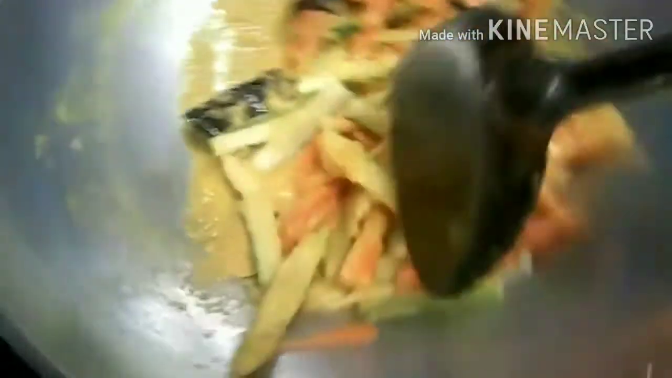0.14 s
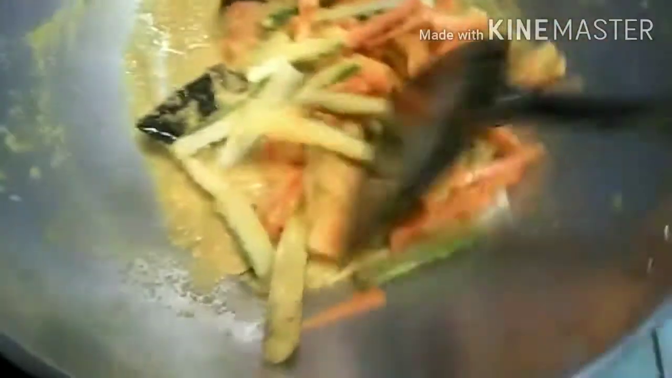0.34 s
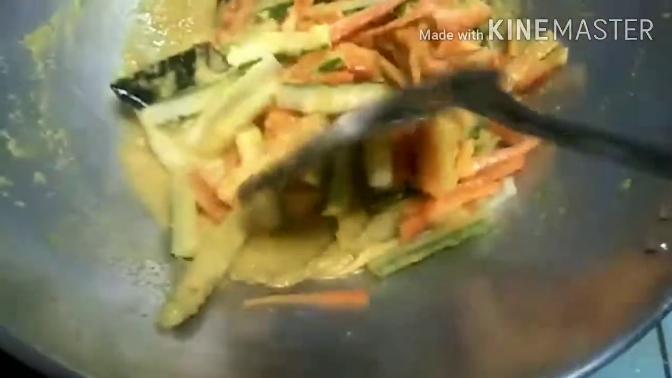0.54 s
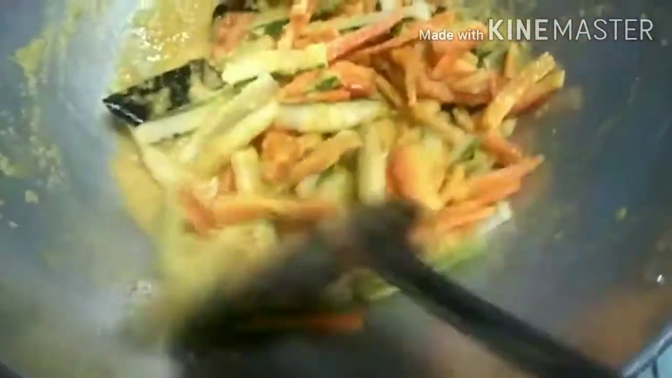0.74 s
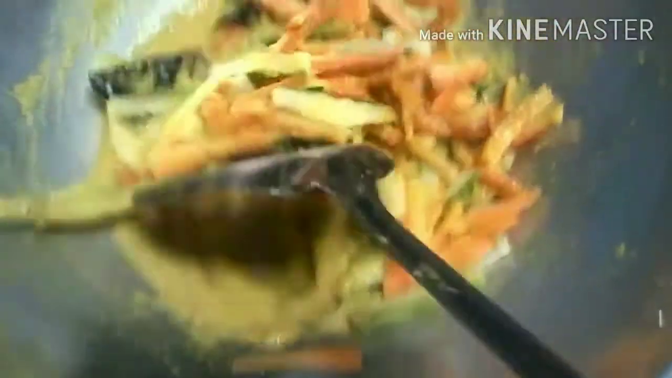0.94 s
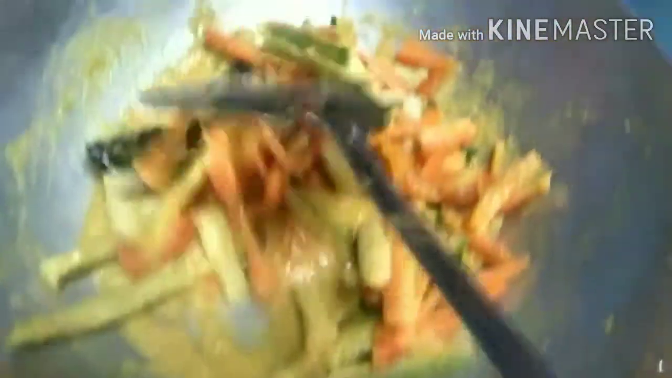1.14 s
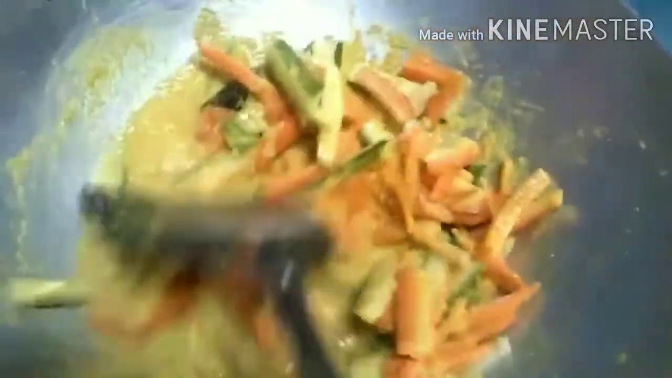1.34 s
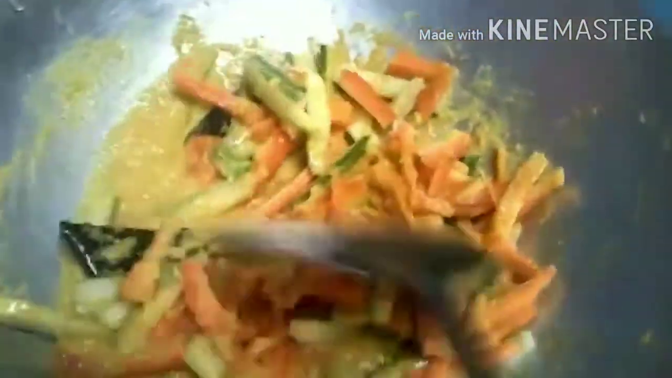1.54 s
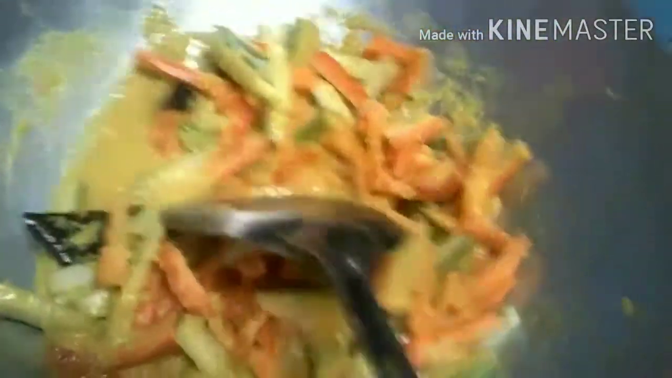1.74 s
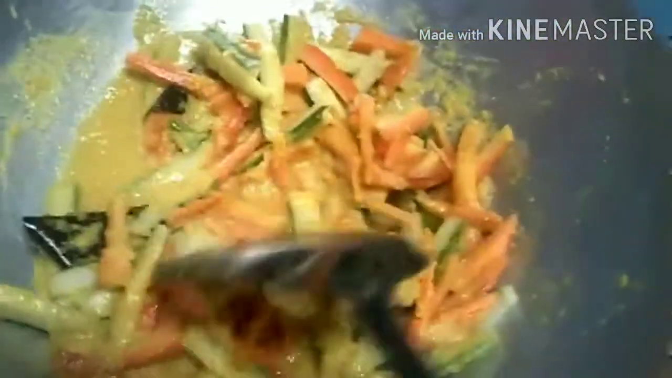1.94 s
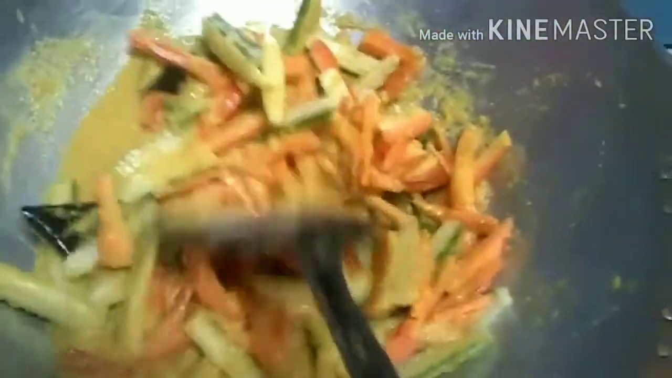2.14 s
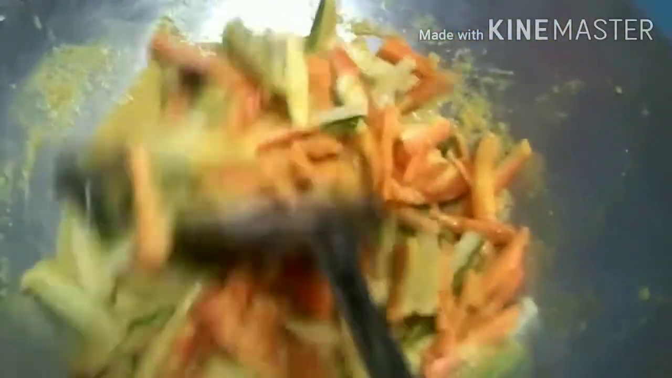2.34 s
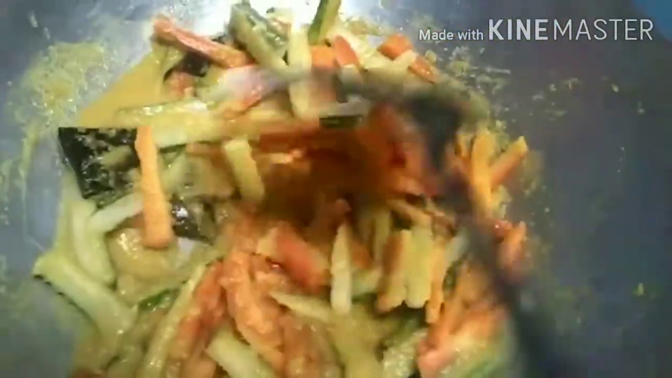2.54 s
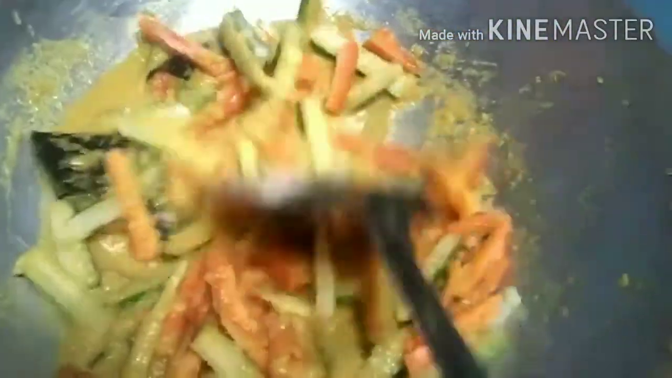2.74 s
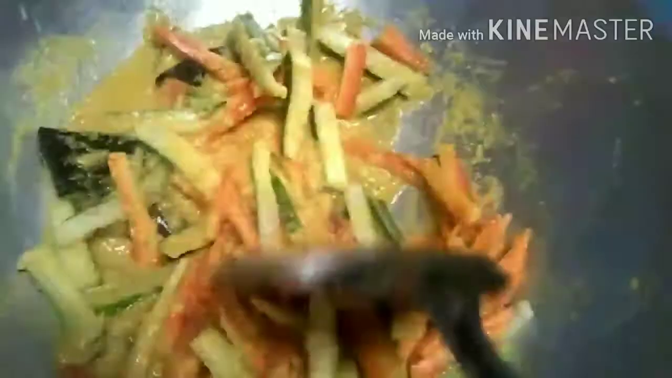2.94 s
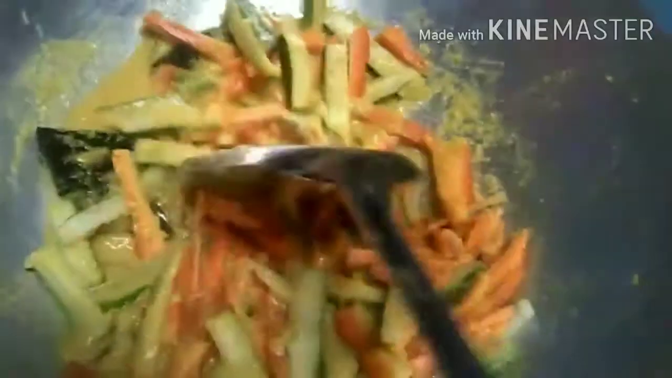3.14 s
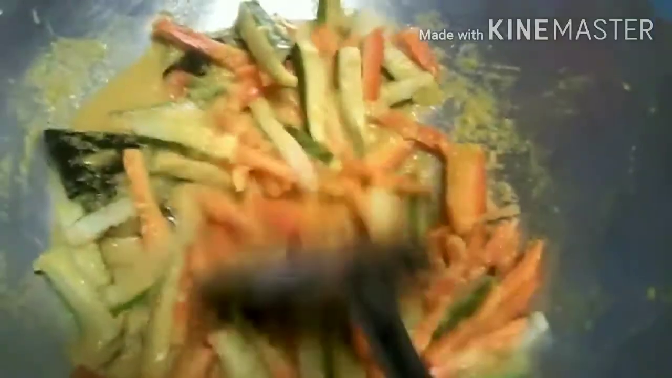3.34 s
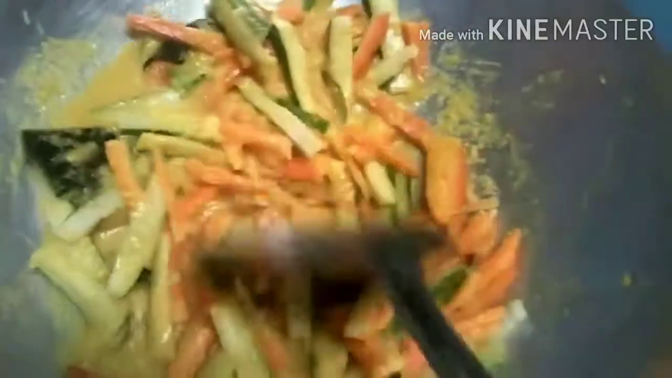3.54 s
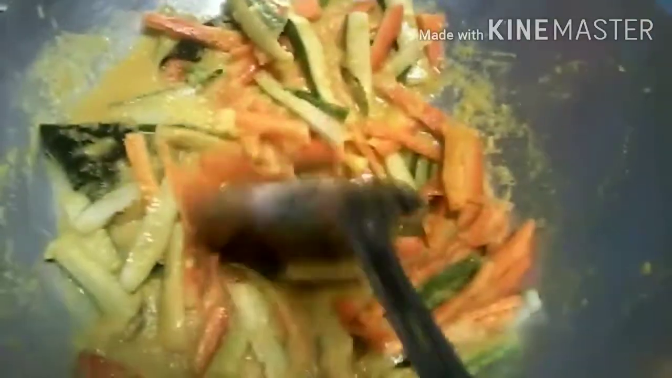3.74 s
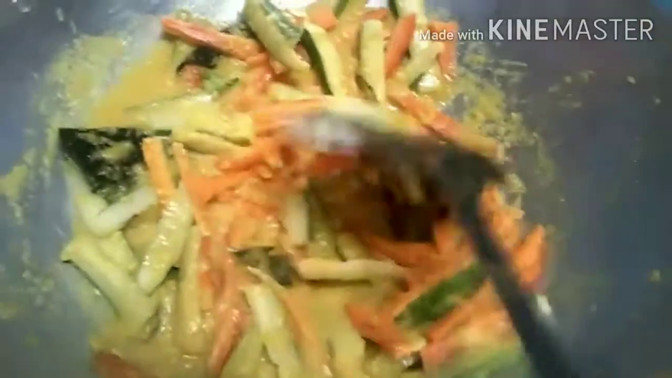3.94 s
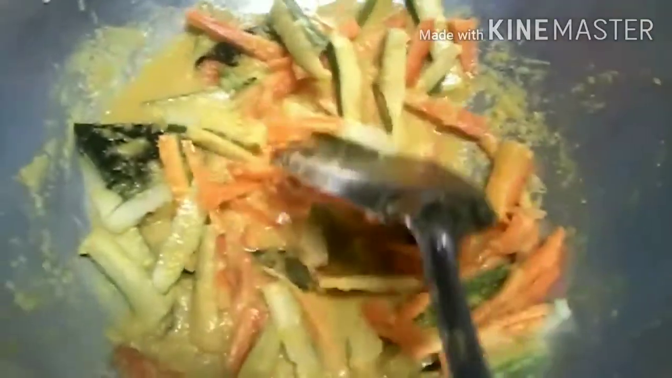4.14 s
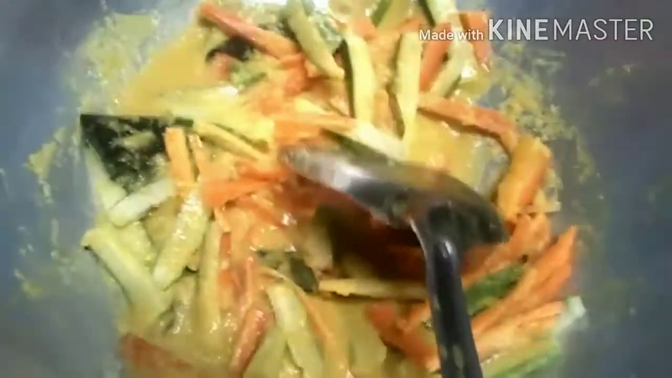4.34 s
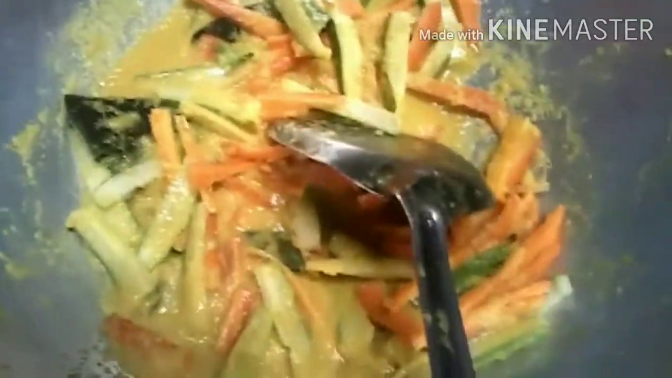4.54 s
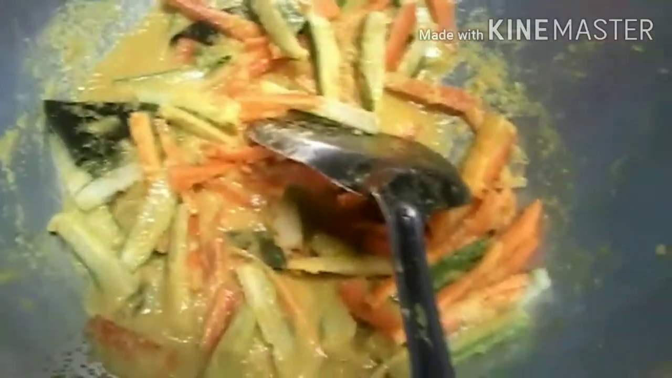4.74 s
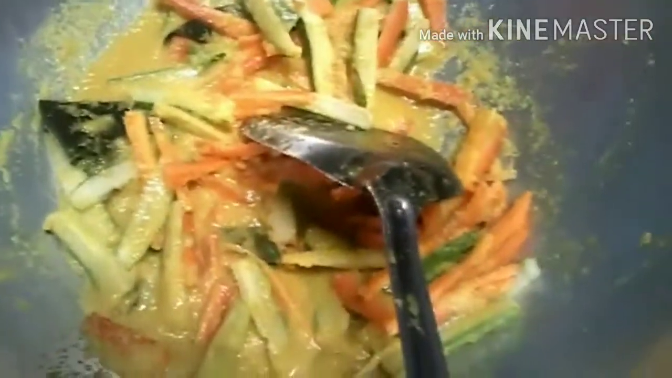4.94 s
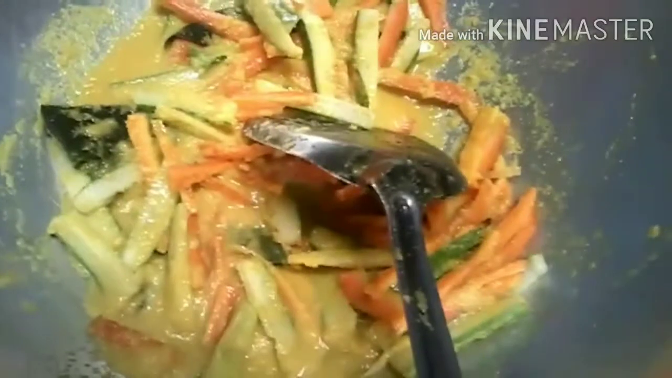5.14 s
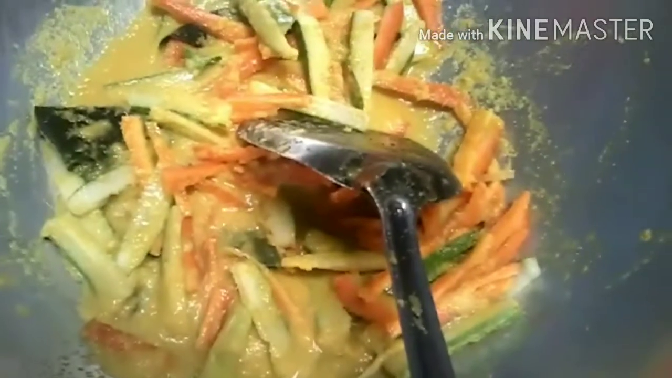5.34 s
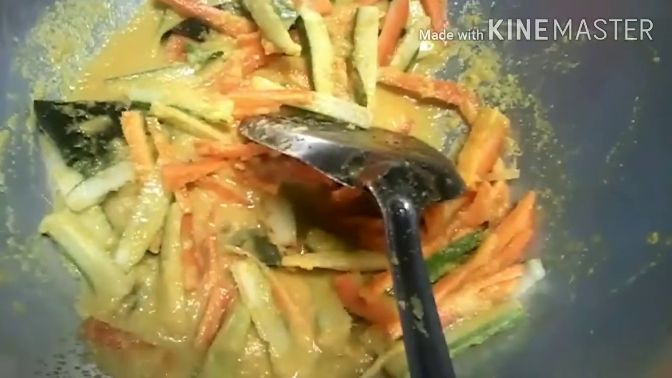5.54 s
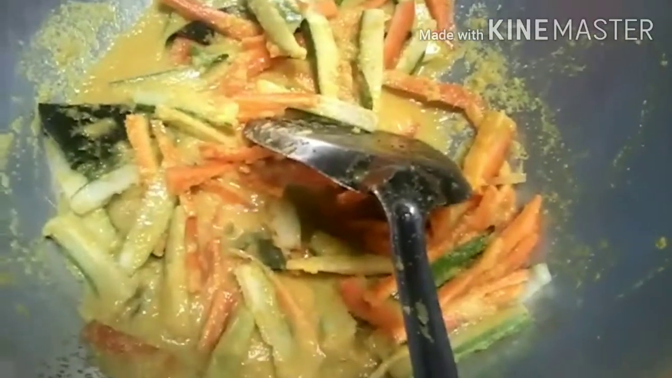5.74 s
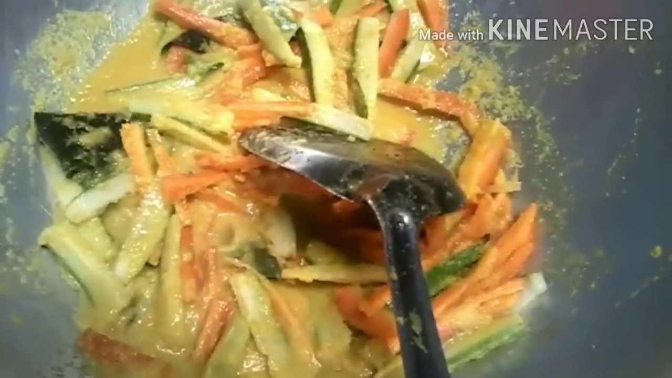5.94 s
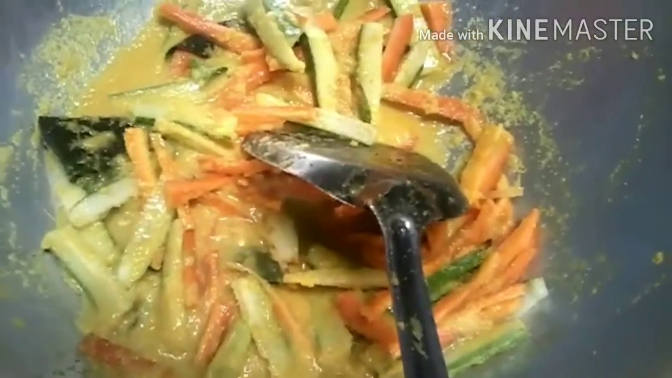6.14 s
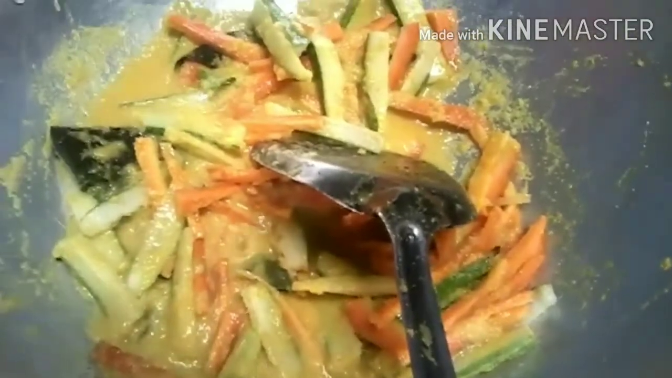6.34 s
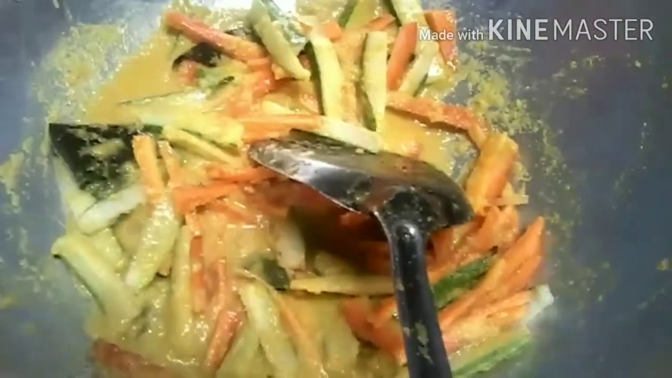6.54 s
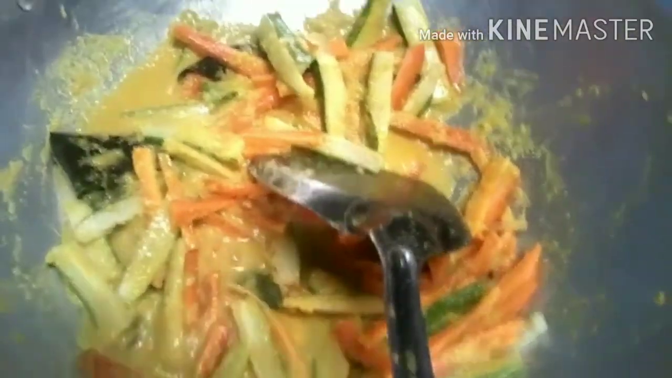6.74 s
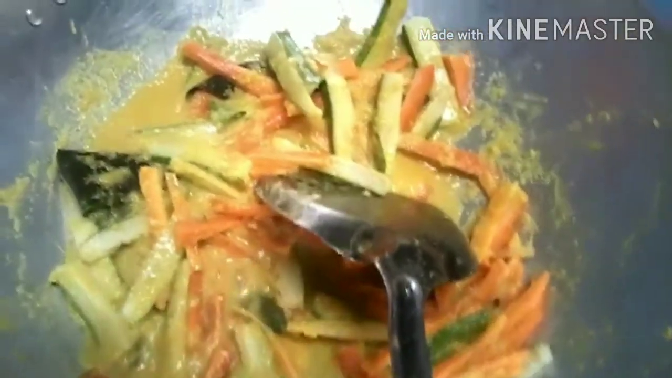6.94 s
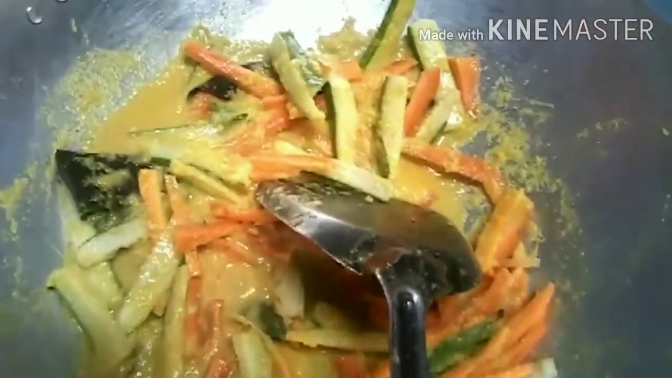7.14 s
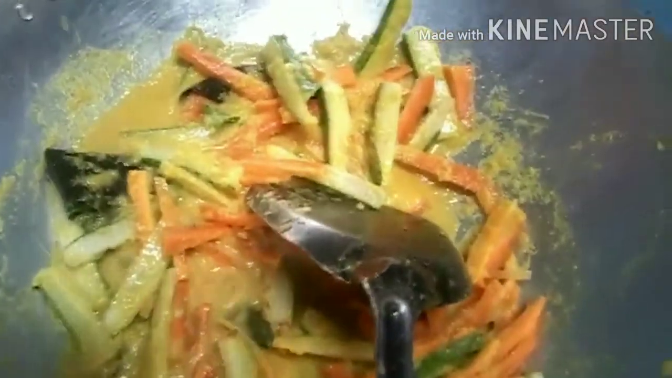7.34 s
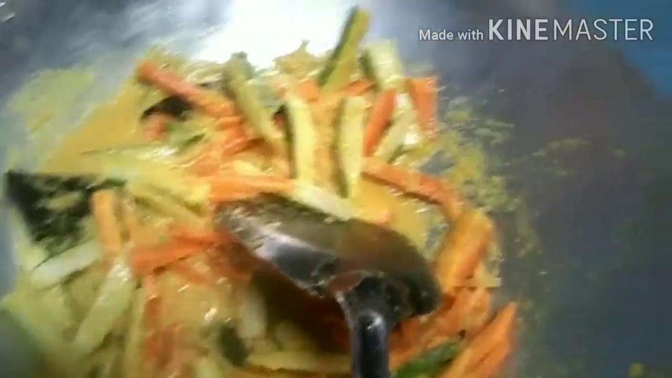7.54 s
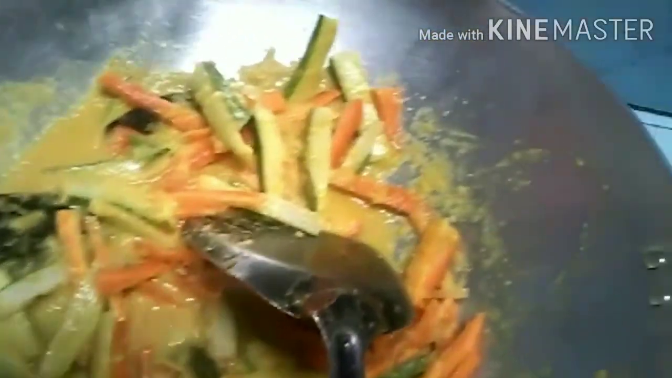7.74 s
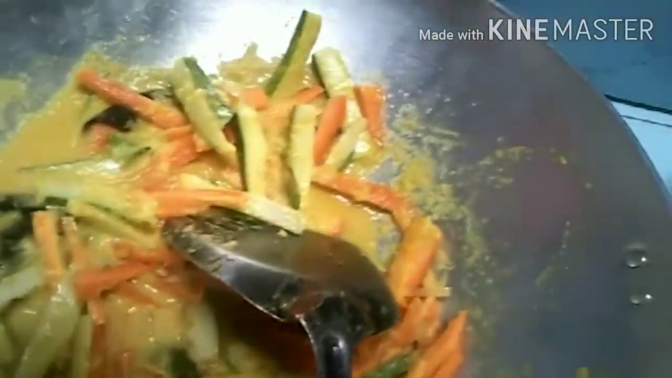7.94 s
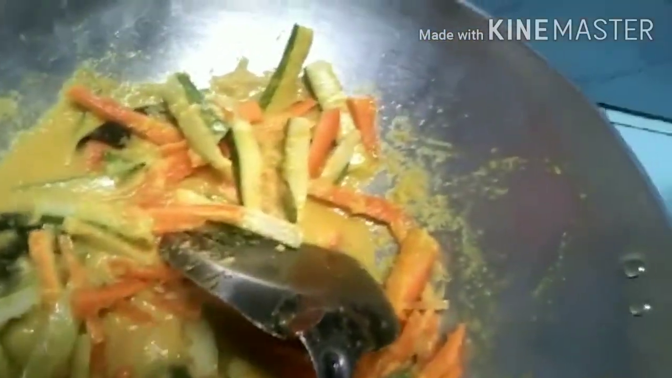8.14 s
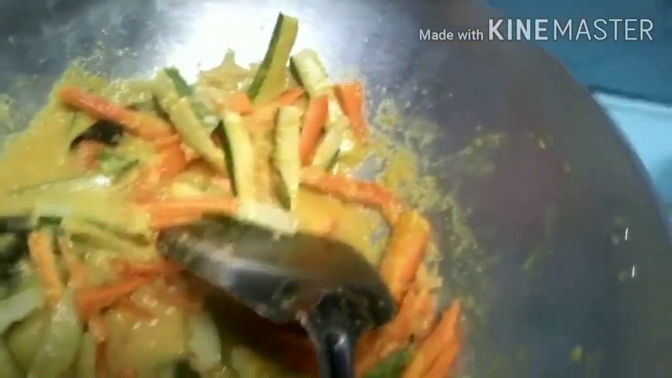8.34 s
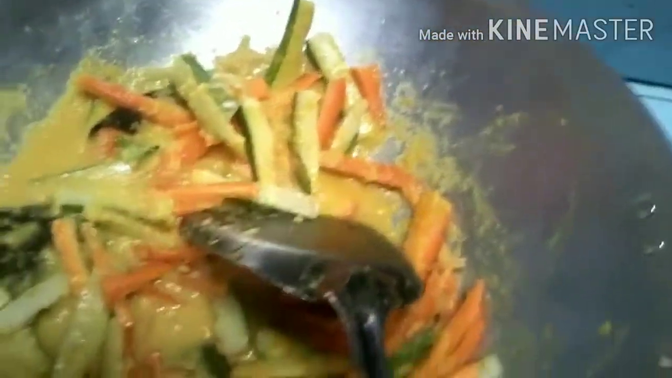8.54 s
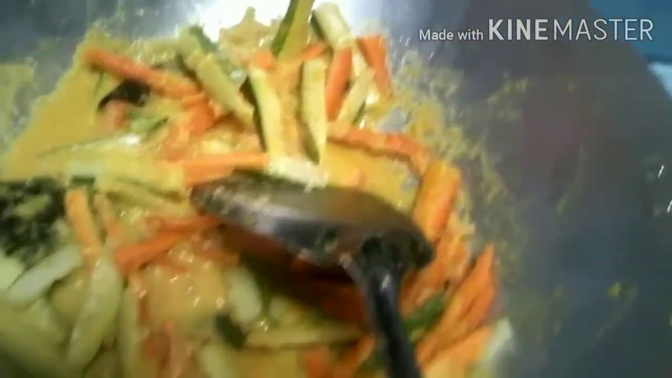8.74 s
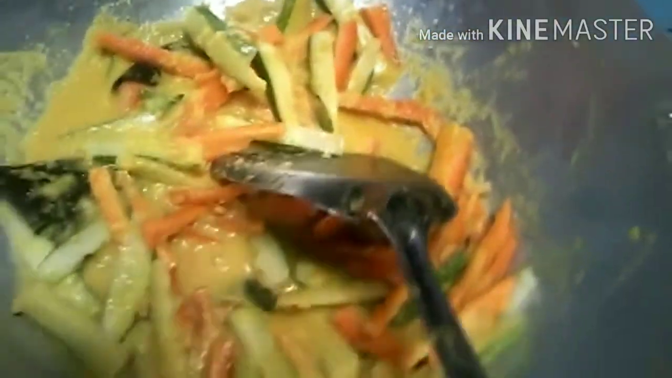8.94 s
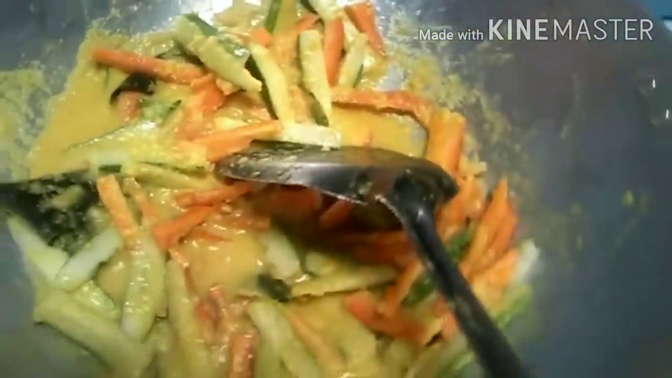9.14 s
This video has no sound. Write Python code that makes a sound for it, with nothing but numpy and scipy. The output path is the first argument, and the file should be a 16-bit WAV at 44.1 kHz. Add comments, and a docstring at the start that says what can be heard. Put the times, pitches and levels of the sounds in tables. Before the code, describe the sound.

A close kitchen sound of saucy vegetables being stirred in a metal wok, with short reflections from bowl and walls. A very faint sizzle and low rush lie beneath. At about 0.25 s the metal spatula hits the wok with a loud, bright, ringing clack. From 0.7 to 3.4 s come short gritty scrapes, wet shoves of soft food, light metallic touches and isolated bubble pops, one sharper at 1.5 s. Two hard knocks at 3.5 s, with a dull thud, and another clack near 4 s end the main stirring. Then it is quiet, with fine ticking bubbles in a fairly even string, brief steam spurts and gradually denser frying. Around 7 s a cluster of bright pops and soft food shifts brings a stronger sizzle. It dips briefly near 7.6 s, then rises to a steady fizz from 8.2 s; a pop and faint deep bumps come near 9 s.

```python
"""Stirring a sauce in a metal wok

A metal spatula clacks on the wok (contact noise exciting modes), scrapes (random slips) and shoves soft food
(dull random bumps); after 4 s only a few touches remain, and the food slumps now and then. Single bubbles pop
as short decaying tones and densify into a sizzle of tiny bursts and fizz. Filtered noise and deep bumps rumble
below."""
import sys
import numpy as np
from scipy import signal
from scipy.fft import rfft, irfft
from scipy.io import wavfile
from scipy.ndimage import uniform_filter1d

SR = 44100
rng = np.random.default_rng(int(sys.argv[2]) if len(sys.argv) > 2 else 0)


def dump(signal):
    """Clip the signal to [-1, 1] and save it as 16-bit WAV at the path in sys.argv[1]."""
    limited = np.clip(np.atleast_2d(signal).T, -1, 1)
    pcm = np.round(limited * 32767).astype(np.int16)
    wavfile.write(sys.argv[1], SR, pcm)


N = 404838
TIME = np.arange(N) / SR  # s

# spectral density of bubbling and sizzling sauce: frequency_hz, density_db (per Hz)
SIZZLE_SPECTRUM = [(410, -40.5), (700, -10.5), (1340, -11), (2080, -5), (2370, 3), (3270, -3), (3970, 1),
                   (4700, -5.5), (5080, -3.5), (7310, -4.5), (9600, -16.5), (15500, -29)]


def undb(db):
    """Amplitude gain is 10 to the power of decibels over 20."""
    return 10 ** (np.asarray(db) / 20)


def unit(x):
    """Power normalisation: scale to rms 1."""
    return x / np.sqrt(np.mean(x ** 2) + 1e-20)


def crest(x):
    """Peak normalisation: scale to peak 1."""
    return x / np.abs(x).max()


def fade(t, t60):
    """Exponential decay of a damped system, 60 dB down after t60."""
    return np.exp(-np.log(1000) * t / t60)


def add(track, start_s, x):
    """Superposition: mix a sound into the track at start_s."""
    i = int(np.clip(start_s * SR, 0, N - 1))
    track[i:i + len(x)] += x[:N - i]


def colour(x, points, size=2048):
    """Minimum-phase filtering: a folded cepstrum makes the (Hz, dB) response causal."""
    hz, db = np.transpose(points)
    grid_hz = np.maximum(np.arange(size // 2 + 1) * SR / size, 1)
    response_db = np.interp(np.log(grid_hz), np.log(hz), db)
    cepstrum = irfft(np.log(undb(response_db)))
    cepstrum[1:size // 2] *= 2
    cepstrum[size // 2 + 1:] = 0
    impulse_response = irfft(np.exp(rfft(cepstrum)))
    return signal.oaconvolve(x, impulse_response)[:len(x)]


def tilted(points, tilt_db):
    """Spectral tilt: a colour made brighter by tilt_db an octave."""
    return [(hz, db + tilt_db * np.log2(hz)) for hz, db in points]


def clicks(rate, spread_db):
    """Shot noise: random impulses, rate a second, many small and a few large; rms 1."""
    dice, size, sign = rng.random((3, N), dtype=np.float32)
    rate = np.broadcast_to(rate, N)
    hit = dice < rate / SR
    rarity = -np.log(np.maximum(size[hit], .02))  # exponentially distributed, capped
    out = np.zeros(N)
    # dividing by the root of the rate keeps the power even where the density changes
    out[hit] = undb(spread_db * rarity) * np.sign(sign[hit] - .5) / np.sqrt(rate[hit])
    return unit(out)


def drift(rate):
    """Low-frequency modulation: linear paths between normal random values, rate values a second."""
    steps = rng.standard_normal(1024)
    return np.interp(TIME * rate, np.arange(len(steps)), steps)


def rumble(bump_s=0.02):
    """Broadband flow noise: the burner's low rush in the room's low resonances, with a few deep bumps."""
    # rush: time_s, level_db (rms)
    rush_levels = [(0, -56.5), (2.7, -57), (4.3, -57.5), (5.8, -55), (9.18, -48)]
    # rush and low room resonances: frequency_hz, density_db (per Hz)
    room_spectrum = [(20, -1.5), (50, -5.5), (90, 3.5), (115, 0), (145, 0.5), (168, -11), (190, 1),
                     (230, -11), (290, -1), (340, -6.5), (430, -9), (800, -15.5), (1500, -23), (15500, -34)]
    # brief deep bumps: centre_s, level_db (peak), pitch_hz
    deep_bumps = [(8.99, -46, 109), (9.03, -38, 56.4), (9.15, -49, 170)]
    rush = unit(colour(rng.standard_normal(N), room_spectrum, size=8192))
    out = rush * undb(np.interp(TIME, *np.transpose(rush_levels)))
    for centre_s, db, hz in deep_bumps:
        since = TIME - centre_s
        out += undb(db) * np.exp(-(since / bump_s) ** 2) * np.sin(2 * np.pi * hz * since)
    return out


def bubble(hz, cycles):
    """Damped oscillation of a bursting bubble: it swells fast and falls 60 dB in the given cycles."""
    turn = np.arange(SR // 100) * hz / SR
    return crest(np.sin(2 * np.pi * turn) * (1 - np.exp(-turn ** 2)) * fade(turn, cycles))


def bubbling(rate, cycles, count):
    """Random superposition: swarms of tiny bursts at count pitches, coloured like the sizzle; rms 1."""
    hz_points, db_points = np.transpose(SIZZLE_SPECTRUM)
    out = np.zeros(N)
    for hz in np.geomspace(2700, 11000, count):
        # the root of the pitch turns density per Hz into level per geometric band
        weight = undb(np.interp(hz, hz_points, db_points)) * np.sqrt(hz)
        swarm = signal.oaconvolve(clicks(rate, spread_db=4), bubble(hz, cycles))[:N]
        out += weight * unit(swarm)
    return unit(out)


def frying(lone=0.051, flutter_db=1.76, spurt_half_s=.017):
    """Event density sets texture: tiny bursts stand alone at low heat and merge over a fizz as it grows."""
    # frying: time_s, level_db
    fry_levels = [(0, -56), (1.5, -61), (2.1, -66), (3.9, -63), (5.4, -58.5), (5.9, -55.5), (6.7, -53),
                  (7.0, -47), (7.4, -46.5), (7.6, -50), (8.2, -43), (9.18, -41.5)]
    # spurts of steam from under the food: centre_s, rise_db (over the frying)
    steam_spurts = [(4.806, 8), (5.134, 6), (5.786, 7.5), (5.883, 5.5), (6.203, 7), (6.298, 10), (6.75, 8)]
    heat_db = np.interp(TIME, *np.transpose(fry_levels))
    for centre_s, rise_db in steam_spurts:
        heat_db += rise_db * np.exp(-((TIME - centre_s) / spurt_half_s) ** 2)
    lull_db = heat_db.max() - heat_db
    busy = undb(-lull_db)
    crackle = bubbling(rate=90 * busy, cycles=9, count=11)
    fizz = colour(clicks(rate=12000 * busy, spread_db=2.0), SIZZLE_SPECTRUM)
    fizz = unit(fizz * undb(flutter_db * drift(rate=35)))
    share = undb(-5 + lone * lull_db)  # crackle against fizz, larger in the lulls
    return undb(heat_db) * (fizz + share * crackle) / np.hypot(1, share)


def effort(part, drag_db):
    """Force envelope: pushes swell, sag and let go over a light drag; gain for "blade" or "food"."""
    # pushes and shifts of food: start_s, rise_s, length_s, blade_db, food_db (gains before each layer's trim)
    pushes = [(0.691, .006, .018, -46.5, -57), (0.754, 0.017, 0.031, -57, -47.5),
              (0.799, .04, .05, -47, -53), (0.878, .065, .14, -50, -39), (1.095, 0.0069, .1, -46.5, -52),
              (1.218, 0.023, .13, -47, -43.5), (1.492, 0.037, 0.095, -44.5, -49),
              (1.642, 0.026, 0.074, -46.5, -52.5), (1.743, 0.047, .085, -48.5, -39.5),
              (1.867, 0.016, 0.066, -44, -38.5), (2.155, 0.015, 0.031, -43.5, -47.5),
              (2.216, 0.054, .19, -50, -58), (2.463, .085, 0.12, -41.5, -49.5),
              (2.796, .012, .15, -45, -52.5), (2.87, .05, .09, -56.5, -51.5),
              (3.12, 0.01, 0.047, -50.5, -56), (3.189, 0.028, .07, -48, -53.5),
              (3.368, 0.0089, .02, -48.5, -72), (3.707, .03, 0.066, -60, -46),
              (3.865, 0.012, 0.19, -59, -54), (5.08, .1, 0.27, -76, -54), (6.862, 0.035, 0.19, -66, -43.5),
              (7.104, 0.054, 0.34, -66, -42)]
    sag_db, release_s = 4, 0.21  # force lost along a push; t60 of its end
    drag_until_s = 2  # until then the spatula never leaves the food
    gain = undb(drag_db) * fade(np.maximum(TIME - drag_until_s, 0), release_s)
    t = np.arange(SR) / SR
    for start_s, rise_s, length_s, blade_db, food_db in pushes:
        attack = np.minimum(t / rise_s, 1)
        hold = undb(-sag_db * np.minimum(t / length_s, 1))
        release = fade(np.maximum(t - length_s, 0), release_s)
        push_db = blade_db if part == "blade" else food_db
        add(gain, start_s, undb(push_db) * attack * hold * release)
    return gain


def wok_ring(t, damping, best_hz=None, split_hz=9):
    """Mode splitting: the wok is not quite round, so modes are beating pairs; blows favour those near best_hz."""
    # wok modes: mode_hz (before splitting), level_db (before favour and scatter), t60_s (before damping)
    wok_modes = [(339, -15, .5), (696, -8, .5), (937, -9, .3), (1136, -6, .35), (1342, -7.5, .46),
                 (1861, -6, .45), (2175, -5, .35), (2455, -3.5, .42), (2710, -4, .4), (3079, -7, .42),
                 (3685, -3, .42), (3774, 2, .44), (4005, -6, .42), (4280, -5, .4), (4720, -7, .4),
                 (4980, -7, .4), (5993, -6, .4), (6360, -6, .48), (6565, -7, .36), (6760, -4, .33),
                 (6894, -4, .4), (7280, -5, .26)]
    ring = np.zeros(len(t))
    for hz, db, t60 in wok_modes:
        favour_db = 0
        if best_hz:
            favour_db = 7 * np.exp(-(np.log2(hz / best_hz) / .12) ** 2)  # width in octaves
        pair_hz = hz + split_hz * rng.uniform(-1.03, 1, (2, 1))
        pair = np.sin(2 * np.pi * (pair_hz * t + rng.random((2, 1)))).sum(0)
        scatter_db = rng.standard_normal()
        ring += undb(db + favour_db + scatter_db) * fade(t, t60 / damping) * pair
    return ring


def scraping(gain_db=-4.0, catch_db=2.5):
    """Stick-slip friction: the edge's uneven slips stir the wok's damped modes, and wet pieces smack apart."""
    # scraping grit: frequency_hz, density_db (per Hz)
    grit_spectrum = [(710, -48), (1200, -11), (1550, -12.5), (1800, -4), (2190, -4), (2430, 0.5),
                     (3350, -5), (5090, -4.5), (6800, -10), (7650, -7), (10800, -21.5), (15500, -29)]
    push = effort("blade", drag_db=-61)
    slips = clicks(rate=1600, spread_db=1.5) * push * undb(catch_db * drift(rate=65))
    grit = unit(colour(slips, grit_spectrum))
    modes = wok_ring(np.arange(SR // 2) / SR, damping=1.8)
    ring = undb(-7) * unit(signal.oaconvolve(slips, modes)[:N])
    smacks = undb(-6) * push * bubbling(rate=25, cycles=12, count=5)
    return undb(gain_db) * (slips.std() * (grit + ring) + smacks)


def shoving(gain_db=-2.5, tilt_db=2.0):
    """Soft-contact noise: wet pieces rub and tumble in dense, dull little bumps."""
    # shifted food: frequency_hz, density_db (per Hz, before the tilt)
    food_spectrum = [(71, -49), (120, -1.5), (209, -1), (248, 5.5), (489, -7.5), (657, -2), (862, -16),
                     (987, -11), (1300, -21.5), (1800, -18), (2340, -52), (3960, -120)]
    bumps = unit(colour(clicks(rate=700, spread_db=3.0), tilted(food_spectrum, tilt_db)))
    return undb(gain_db) * bumps * effort("food", drag_db=-65)


def simmer(count=60):
    """Quasi-periodic bubbling: a fairly even string of steam bubbles, louder with time, as rows like the pops."""
    from_s, gap_s, jitter_s = 4.3, .095, .018
    start_db, growth_db_per_s, spread_db = -40.5, 1.5, 2
    centre_hz, spread_octaves = 4200, 0.2
    late, size, pitch = rng.standard_normal((count, 3)).T
    since = gap_s * np.arange(count) + jitter_s * late
    db = start_db + growth_db_per_s * since + spread_db * size
    hz = centre_hz * 2 ** (spread_octaves * pitch)
    return [row for row in zip(from_s + since, db, hz) if row[0] < TIME[-1]]


def pops(cycles=13):
    """Bubble resonance: each larger bubble is a damped tone with the faint noise snap of its tearing skin."""
    # loudest bursting bubbles: start_s, peak_db, pitch_hz
    large_bubbles = [(0.149, -30.5, 7450), (0.4997, -30, 3240), (0.6995, -26, 4020), (0.811, -33, 7500),
                     (1.5262, -20, 5180), (1.8431, -29, 3600), (2.2914, -29, 3680), (2.836, -30, 7460),
                     (4.3812, -34, 7600), (4.4117, -35.5, 4300), (4.581, -36, 4220), (4.729, -33.5, 4280),
                     (4.7949, -35.5, 4210), (4.9667, -31, 4500), (5.0604, -30, 4400), (5.143, -27.5, 4620),
                     (5.227, -26, 4800), (5.439, -34, 4070), (5.7702, -29.5, 7200), (5.9564, -30.5, 4300),
                     (6.0028, -24, 2710), (6.2386, -29.5, 4260), (6.2941, -32.5, 2780),
                     (6.6046, -26.5, 2600), (6.825, -30, 2880), (6.8856, -23.5, 4830),
                     (6.9847, -15.5, 4100), (7.017, -16.5, 4100), (7.0453, -23, 4400), (7.0637, -24, 3840),
                     (7.3301, -27, 4230), (7.3965, -21, 3960), (8.9256, -19, 2760)]
    out, t = np.zeros(N), np.arange(SR // 100) / SR
    for start_s, db, hz in list(large_bubbles) + simmer():
        tear = rng.standard_normal(len(t)) * (1 - np.exp(-t * hz / 2)) * fade(t, .008)
        snap = undb(-9) * crest(colour(tear, tilted(SIZZLE_SPECTRUM, 3)))
        add(out, start_s, undb(db) * crest(bubble(hz, cycles) + snap))
    return out


def blow(length_s, blade_hz, blade_db, ring_db, t60, modes_db, tilt_db, best_hz, damping=1.13):
    """Impact excitation: a contact crack, a short blade note, then the shell's dense ring and clear modes."""
    # contact noise: frequency_hz, density_db (per Hz, before the tilt)
    contact_spectrum = [(100, -24), (400, -21.5), (620, -7), (790, -8), (1000, -2.5), (1500, -15),
                        (2300, 0.5), (4500, -3), (7000, -4), (9000, -15.5), (15500, -25.5)]
    # the shell's dense ring: frequency_hz, density_db (per Hz, before the tilt)
    shell_spectrum = [(80, -7.5), (300, -3), (600, -5), (790, -6), (1030, -2), (1600, -7), (2400, -0.5),
                      (3200, -3), (3900, 2.5), (5500, -4.5), (7000, -0.5), (9000, -12), (12000, -20),
                      (15500, -25)]
    t = np.arange(SR // 2) / SR
    early = slice(0, SR // 25)  # 40 ms over which ring levels are set
    push = t / length_s * np.exp(1 - t / length_s)
    crack = crest(colour(push * rng.standard_normal(len(t)), tilted(contact_spectrum, tilt_db)))
    swell = 1 - np.exp(-(t / length_s) ** 2)
    blade = crest(np.sin(2 * np.pi * blade_hz * t) * swell * fade(t, .012))
    contact = crest(crack + undb(blade_db) * blade)
    shell = colour(rng.standard_normal(len(t)) * fade(t, t60), tilted(shell_spectrum, tilt_db))
    modes = wok_ring(t, damping, best_hz)
    ring = shell / shell[early].std() + undb(modes_db) * modes / modes[early].std()
    ring *= undb(ring_db) / ring[early].std()
    return contact + ring * (1 - np.exp(-t / 0.001))


def spatula_blows(tap_db=-1, tap_length_s=0.0022, tap_blade_db=-6, tap_t60=0.18, tap_modes_db=-4, tap_tilt_db=-1):
    """Contact time shapes the spectrum: hard clacks on the bare wall and light touches among the food."""
    # hard blows: start_s, contact_peak_db, contact_s, blade_hz, blade_db (re crack), ring_db, ring_t60_s,
    # modes_db (re dense ring), tilt_db (an octave), best_hz (best-excited ring)
    clacks = [(0.2473, -1, 0.0017, 6960, -5.5, -18, 0.45, -2, .5, 3700),
              (3.4888, -4.5, 0.00064, 4500, -13.5, -30, 0.66, -4, 0, 1340),
              (3.5483, -1.5, .0011, 2620, -3.5, -26.5, 0.46, -6.5, -.5, 2620),
              (3.984, -2.5, 0.0013, 3820, -1, -32, 0.45, -5, -1, 4280),
              (3.989, -9, 0.001, 4850, -4, -35, 0.17, -7, -0.5, 6900)]
    # light touches: start_s, peak_db (before tap_db), blade_hz, ring_db (re peak)
    taps = [(0.839, -32.5, 2450, -22), (1.1066, -29, 2440, -23), (1.5, -30, 7700, -26),
            (1.8094, -29, 2780, -19.5), (1.864, -24, 5320, -41), (1.884, -22.5, 2376, -42),
            (2.1602, -32.5, 2270, -25), (2.174, -32.5, 1900, -23), (2.555, -24.5, 3596, -24.5),
            (2.788, -37.5, 3010, -22), (2.8097, -31, 2390, -39), (2.8352, -32, 2330, -20),
            (3.204, -34.5, 2570, -32), (3.382, -41, 1880, -27), (7.486, -34, 2290, -29)]
    out = np.zeros(N)
    for start_s, db, length_s, hz, blade_db, ring_db, t60, modes_db, tilt_db, best_hz in clacks:
        clack = blow(length_s, hz, blade_db, ring_db - db, t60, modes_db, tilt_db, best_hz)
        add(out, start_s, undb(db) * clack)
    for start_s, db, hz, ring_db in taps:
        tap = blow(tap_length_s, hz, tap_blade_db, ring_db, tap_t60, tap_modes_db, tap_tilt_db, hz)
        add(out, start_s, undb(db + tap_db) * tap)
    return out


def thuds(rise_s=.0015):
    """Cushioned impact: knocks of food and spatula on the wok's belly reach only its low resonances."""
    # soft knocks: start_s, peak_db, t60_s, pitch_hz
    knocks = [(0.39, -34, 0.33, 360), (1.606, -40, 0.11, 480), (1.881, -26.5, 0.11, 450),
              (2.616, -38.5, 0.15, 517), (2.807, -38, 0.086, 327), (3.4889, -14, 0.062, 436),
              (3.503, -22.5, 0.13, 434), (4.48, -33, 0.15, 277), (8.913, -35, 0.039, 1100)]
    # knock colour: pitch_multiple, response_db
    belly_response = [(.15, -18), (.4, -1), (.7, 4), (1.35, 2), (2, -9.5), (3.4, -24.5), (8, -45)]
    out, t = np.zeros(N), np.arange(SR // 2) / SR
    for start_s, db, t60, hz in knocks:
        push = rng.standard_normal(len(t)) * (1 - np.exp(-t / rise_s)) * fade(t, t60)
        response = [(hz * multiple, response_db) for multiple, response_db in belly_response]
        add(out, start_s, undb(db) * crest(colour(push, response)))
    return out


def squeals(waver=0.0076):
    """Friction locking: slips lock on to one resonance, which sings briefly with an unsteady pitch."""
    # squeals of the blade's edge: centre_s, half_length_s, pitch_hz, level_db (rms)
    edge_squeals = [(1.36, 0.008, 4450, -52.5), (1.415, 0.015, 3004, -52.5), (2.355, 0.03, 1900, -57),
                    (3.41, 0.04, 1890, -63), (3.44, 0.097, 1323, -66)]
    out, t = np.zeros(N), np.arange(SR // 4) / SR
    middle_s = t.mean()
    for centre_s, half_s, hz, db in edge_squeals:
        wander = unit(uniform_filter1d(rng.standard_normal(len(t)), size=200))
        pitch_hz = hz * (1 + waver * wander)
        note = unit(np.sin(2 * np.pi * np.cumsum(pitch_hz) / SR))
        swell = np.exp(-((t - middle_s) / half_s) ** 2)
        add(out, centre_s - middle_s, undb(db) * note * swell)
    return out


def kitchen(x, wet_db, t60):
    """Reverberation: close reflections from the bowl and the walls as decaying noise."""
    t = np.arange(SR // 2) / SR
    tail = rng.standard_normal(len(t)) * fade(t, t60) * (1 - np.exp(-t / 0.0011))
    return x + undb(wet_db) * signal.oaconvolve(x, tail / np.linalg.norm(tail))[:N]


def scene():
    """Superposition of sauce and stirring, each with reflections, and the direct blows and rumble."""
    sauce = kitchen(pops() + frying(), wet_db=-11.5, t60=0.21)
    stirring = kitchen(scraping() + squeals() + shoving() + thuds(), wet_db=-8.5, t60=0.34)
    return (spatula_blows() + sauce + stirring + rumble())[None]


def record(dry):
    """Band limitation: a steep elliptic low-pass cuts the top above 15.8 kHz."""
    low_pass = signal.ellip(10, .2, 70, 15800, fs=SR, output="sos")
    return signal.sosfilt(low_pass, dry)


dry = scene()
out = record(dry)
dump(out)
```